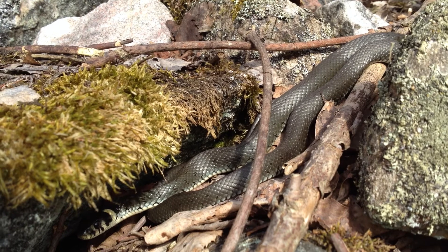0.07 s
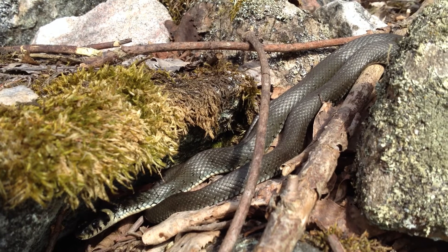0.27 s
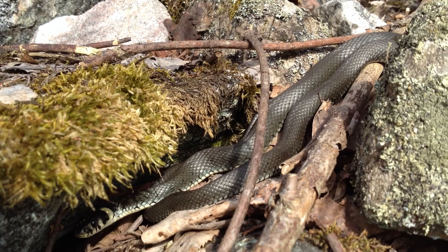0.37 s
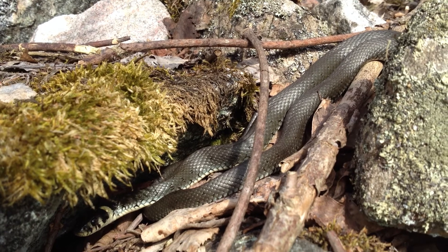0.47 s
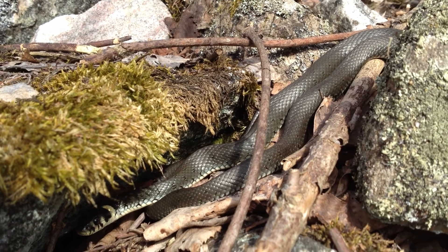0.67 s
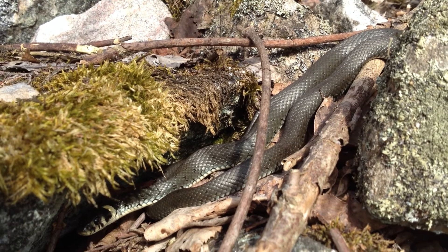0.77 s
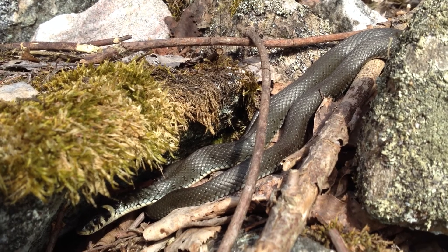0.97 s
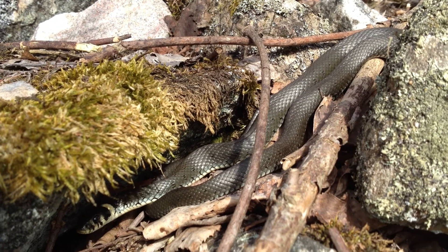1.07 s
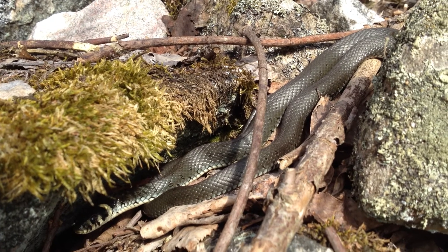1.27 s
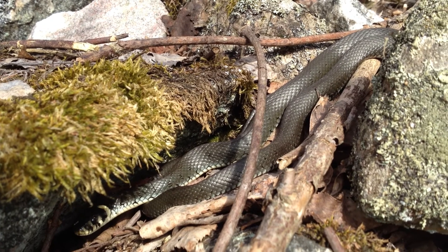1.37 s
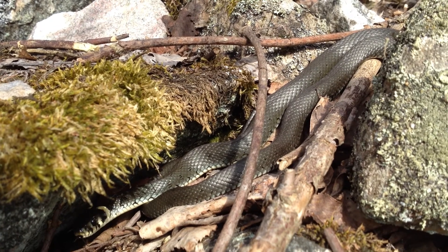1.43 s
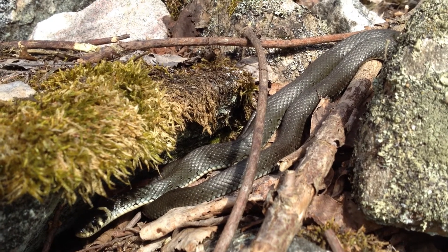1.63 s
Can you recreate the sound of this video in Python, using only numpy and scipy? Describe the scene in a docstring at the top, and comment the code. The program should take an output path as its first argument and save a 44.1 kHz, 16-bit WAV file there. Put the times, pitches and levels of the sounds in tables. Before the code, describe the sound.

Dry leaves rustle and small twigs snap in uneven bursts under a slithering snake.

```python
"""A snake slides through dry leaves and twigs between rocks, close to the microphone.
From the start, over faint outdoor air, its scales rub the litter in a fine crackle, and the rocks
scatter the rustle for a few hundredths of a second. Leaves crumple in short bursts, then ribs and
twigs crack. A soft bump on the ground follows near 0.4 s. From 0.6 s the belly drags over single
leaves and twigs, around 1 s a stick knocks three times, and a few small cracks end the scene."""
import sys
import numpy as np
from scipy import signal
from scipy.fft import rfft, irfft
from scipy.io import wavfile

SR = 44100
rng = np.random.default_rng(int(sys.argv[2]) if len(sys.argv) > 2 else 0)


def wav_out(sig):
    """Save sig, one row per channel (or a flat mono array), as 16-bit PCM at SR to the path in sys.argv[1]."""
    wavfile.write(sys.argv[1], SR, np.round(np.clip(np.atleast_2d(sig).T, -1, 1) * 32767).astype(np.int16))


N = 74970  # 1.7 s


def undb(db):
    """Turn decibels into a factor to multiply by."""
    return 10 ** (np.asarray(db) / 20)


def unit(x):
    """Scale a signal to an average power of 1."""
    return x / np.sqrt(np.mean(x ** 2) + 1e-24)


def colour(x, points, tilt_db=0):
    """Shape the tone along a curve of (Hz, dB) points; tilt_db per octave makes it brighter."""
    hz, db = np.array(points, float).T
    octave = np.log2(np.maximum(np.fft.rfftfreq(4096, 1 / SR), 10))
    gain = unit(undb(np.interp(octave, np.log2(hz), db) + tilt_db * octave))
    cepstrum = irfft(np.log(gain))
    fold = 1 + np.sign(np.fft.fftfreq(len(cepstrum)))  # makes the filter ring after a click, not before
    response = irfft(np.exp(rfft(cepstrum * fold)))
    return signal.fftconvolve(x, response)[:len(x)]


def resonate(x, hz, width_hz):
    """Keep the sound around one pitch and turn the rest down."""
    b, a = signal.iirpeak(hz, hz / min(width_hz, SR / 3), fs=SR)
    return signal.lfilter(b, a, signal.lfilter(b, a, x))


def whiten(x):
    """Give a short burst equal energy at all frequencies, 1 in total."""
    return irfft(np.exp(1j * np.angle(rfft(x))), len(x))


def wander(per_s):
    """A line that drifts to a new random value per_s times a second."""
    return np.interp(np.arange(N) / SR * per_s, np.arange(N), rng.standard_normal(N))


def swell(start, rise, fade):
    """A loudness shape that climbs straight up, then dies away (times in seconds)."""
    t = np.arange(N) / SR - start
    return np.clip(t / rise, 0, 1) * np.exp(-np.maximum(t - rise, 0) / fade)


def crackle(per_s, spread_db):
    """Tiny clicks, or grains, at random moments, a few much larger than the rest."""
    size = undb(spread_db * np.minimum(rng.exponential(size=N), 4))
    return unit((rng.random(N) < per_s / SR) * size * rng.choice([-1, 1], N))


# Tone of the outdoor air: f/Hz, relative level/dB
AIR_TONE = [(25, -37), (60, -13), (100, -11.5), (170, 3.5), (240, 2), (330, 0.5), (700, -4.5), (1200, -2.5),
            (2500, -10), (4000, -5.5), (6000, -25), (15000, -30)]
def air(level_db=-70):
    """Still outdoor air makes a faint, steady, low hush."""
    return undb(level_db) * colour(rng.standard_normal(N), AIR_TONE)


GRAINS_PER_S, GRAIN_SPREAD_DB = 4000, 3.4
# Borders between the sounds of coarse, middle and fine pieces of litter: f/Hz
BAND_EDGES = [2200, 4200, 7800]
# Tone of the rubbing: f/Hz, relative level/dB
RUB_TONE = [(40, -64), (120, -51), (300, -16.5), (700, -7.5), (1100, -6), (1600, -6.5), (2400, -3.5),
            (3800, -3), (5500, -2), (7500, 2), (10000, -2), (12500, -1.5), (15000, -0.5)]
# How loudly the body rubs as it slides: t/s, level/dB
RUB_LEVELS = [(0, -57.5), (0.054, -54.5), (.08, -68.5), (.16, -70.5), (.19, -66), (.24, -54), (.275, -55),
              (.3, -46.5), (0.351, -45.5), (.375, -57.5), (0.412, -56.5), (.5, -64.5), (.58, -58),
              (.65, -59), (.68, -52), (.725, -51), (.76, -47), (0.819, -49), (.85, -59.5), (.89, -56),
              (.935, -52.5), (.958, -55), (1.0, -52.5), (1.035, -51), (1.07, -49.5), (1.115, -53),
              (1.19, -54.5), (1.225, -51.5), (1.25, -59), (1.285, -52), (1.33, -66), (1.365, -53.5),
              (1.43, -56.5), (1.491, -52.5), (1.545, -64.5), (1.6, -62), (1.7, -62.5)]
def scales(flutter_db=2.1, flutter_per_s=170, broad_share=0.91):
    """Scales catch and slip on the litter: a dense crackle that flutters with each catch."""
    level_db = np.interp(np.arange(N) / SR, *np.array(RUB_LEVELS).T)
    level_db += flutter_db * wander(flutter_per_s)
    band = np.searchsorted(BAND_EDGES, np.fft.rfftfreq(N, 1 / SR))
    narrow = sum(irfft(rfft(crackle(GRAINS_PER_S, GRAIN_SPREAD_DB)) * (band == k), N)
                 for k in range(len(BAND_EDGES) + 1))  # each band has its own grains
    broad = crackle(GRAINS_PER_S, GRAIN_SPREAD_DB)  # these sound in all bands at once
    grains = np.sqrt(broad_share) * broad + np.sqrt(1 - broad_share) * narrow
    return colour(grains * undb(level_db), RUB_TONE)


def rocks(x, echo_db=-15.5, delay_s=0.002, fade_60db_s=0.04):
    """The stones around scatter the sound, adding a short blur of echoes."""
    t = np.arange(SR // 5) / SR
    fading_noise = rng.standard_normal(len(t)) * np.exp(-np.log(1000) * t / fade_60db_s)
    echo = whiten(fading_noise)[:len(t) // 2]
    delayed = np.concatenate([np.zeros(int(delay_s * SR)), echo])
    return x + undb(echo_db) * signal.fftconvolve(x, delayed)[:N]


# Tone of a dry leaf: f/Hz, relative level/dB
LEAF_TONE = [(40, -57), (120, -19.5), (300, -7.5), (700, -17.5), (1300, -2.5), (3000, -0.5), (4500, 2),
             (6000, 1.5), (7800, 2), (10000, -2), (12300, 1), (15000, -2.5)]
# Leaves crumpling: t/s, rise/s, fade/s, level/dB, brightness/(dB per octave)
LEAF_CRUMPLES = [(0.026, 0.0064, 0.011, -57, -3), (0.164, 0.0014, 0.012, -59.5, -4),
                 (.197, 0.0013, 0.01, -48.5, 2), (0.224, 0.0082, 0.009, -46.5, 2.5),
                 (0.2825, 0.00071, 0.0074, -40, 1.5), (0.322, 0.0052, 0.013, -34.5, 1.5),
                 (.333, 0.004, 0.0033, -40, -0.5), (0.382, 0.004, 0.012, -50.5, -1.5),
                 (0.508, 0.0035, 0.004, -52, 2.5), (0.619, 0.0071, 0.0098, -51.5, 2.5),
                 (.856, 0.0016, 0.0099, -48, 0.5), (0.896, 0.0027, 0.0097, -45.5, -2),
                 (0.91, 0.0088, 0.0094, -42.5, 2.5), (0.967, 0.0096, 0.0087, -40.5, 1),
                 (1.046, 0.0018, 0.006, -41, -1), (1.164, 0.0048, 0.016, -50, 1),
                 (1.184, 0.0071, 0.0028, -48, 0), (1.241, 0.0021, 0.0015, -35, 8),
                 (1.253, 0.0018, 0.0058, -36, 7.5), (1.259, 0.0043, 0.0089, -43.5, 3.5),
                 (1.301, 0.0013, 0.0022, -47.5, 0), (1.345, 0.0022, 0.006, -51.5, 1)]
def leaves():
    """Each leaf gives way in a swelling shower of tiny breaks."""
    grains = crackle(per_s=9000, spread_db=4)
    return sum(colour(grains * swell(start, rise, fade) * undb(db), LEAF_TONE, tilt)
               for start, rise, fade, db, tilt in LEAF_CRUMPLES)


# Tone shared by all cracks: f/Hz, relative level/dB
CRACK_TONE = [(50, -52), (700, -10), (1400, -6.5), (3000, -1), (6000, -6), (7800, 2), (10000, -1),
              (12300, 9), (15000, -7.5)]
# Single cracks of leaf ribs and twigs: t/s, level/dB, f/Hz, fade/s
RIB_CRACKS = [(0.1725, -50.5, 8740, 0.00039), (0.2314, -43.5, 8350, 0.0005), (0.259, -39, 8100, 0.00019),
              (0.2675, -38.5, 7450, 0.00051), (.2822, -29, 8060, 0.00031), (0.3062, -41, 7950, .0003),
              (0.3131, -28.5, 4840, 0.0003), (0.3353, -27, 7850, 0.00047), (0.3366, -29.5, 1930, 0.00018),
              (0.3427, -27, 3600, 0.00023), (0.3434, -28, 7660, 0.00028), (0.388, -39, 7100, 0.00017),
              (0.4445, -45, 4500, 0.00015), (0.448, -43, 4770, 0.00033), (0.465, -41, 5850, 0.00064),
              (0.4657, -49.5, 2600, 0.0005), (0.5245, -46.5, 4300, 0.00049), (.679, -40, 3930, 0.00046),
              (0.9064, -41.5, 8550, 0.00036), (0.9184, -31, 5150, 0.00043), (0.9185, -36.5, 14200, 0.00044),
              (1.0225, -51, 6500, 0.00048), (1.0413, -42, 2750, 0.00058), (1.042, -44, 8150, 0.00075),
              (1.079, -48, 6900, 0.00048), (1.5378, -45, 5800, 0.00065), (1.6256, -59, 7000, 0.00057),
              (1.6463, -58, 9700, 0.00087), (1.651, -51.5, 5800, .0005), (1.683, -51.5, 5800, 0.0006)]
def cracks(window_s=0.02, sharpness=2.2, raw_tear_db=-6):
    """A leaf rib or twig tears in a millisecond or so: a snap that rings around its own pitch."""
    out = np.zeros(N)
    t = np.maximum(np.arange(-window_s / 2, window_s / 2, 1 / SR), 0)  # the tear starts halfway in
    for time, db, hz, fade in RIB_CRACKS:
        tear = whiten(rng.choice([-1, 1], len(t)) * t ** 2 * np.exp(-t / fade))
        ring = unit(resonate(tear, hz, hz / sharpness))
        snap = unit(ring + undb(raw_tear_db) * unit(tear))
        snap *= np.sqrt(2 * fade / window_s)  # a longer tear carries more energy
        at = int((time - fade - window_s / 2) * SR)
        out[at:at + len(t)] += undb(db) * snap[:N - at]
    return colour(out, CRACK_TONE)


def thud(level_db=-78):
    """A soft bump on the ground gives a brief, low rumble."""
    rumble = unit(resonate(rng.standard_normal(N), hz=85, width_hz=110))
    return undb(level_db) * rumble * swell(start=0.372, rise=0.014, fade=0.027)


# Long drags over one leaf or twig, plus a brief chatter of the stick around its loudest knock (the 720 Hz row):
# t/s, length/s, level/dB, f/Hz
RINGING_DRAGS = [(0.627, 0.16, -60.5, 3850), (0.724, 0.13, -58, 3300), (0.964, 0.058, -58.5, 720),
                 (1.144, 0.063, -66, 1040), (1.238, 0.048, -65, 664), (1.306, 0.26, -70.5, 845)]
def drags(sharpness=1.53):
    """The belly drags over a single leaf or twig, and the knocked stick chatters briefly; the grains ring
    loosely around each one's pitch."""
    grains = crackle(GRAINS_PER_S, GRAIN_SPREAD_DB)
    out, t = np.zeros(N), np.arange(N) / SR
    for start, length, db, hz in RINGING_DRAGS:
        arch = np.sin(np.pi * np.clip((t - start) / length, 0, 1))
        out += undb(db) * arch * unit(resonate(grains, hz, hz / sharpness))
    return out


# Tones the stick rings with: f/Hz, relative level/dB, time to fade by 60 dB/s
STICK_TONES = [(283, -10.5, 0.024), (490, -6.5, 0.012), (783, -4, 0.023), (1265, -4.5, 0.02),
               (1920, -13, 0.017), (2590, -2, 0.0092)]
# Knocks on the stick: t/s, level/dB
STICK_KNOCKS = [(.899, -48.5), (.9803, -34), (1.05, -60)]
def stick(contact_s=0.0003, low_cut_hz=186):
    """A dry stick is nudged against its neighbour and rings dully; it is too thin to give much bass."""
    out, t = np.zeros(N), np.arange(SR // 10) / SR
    ring = sum((-1) ** k * undb(db) * np.sin(2 * np.pi * hz * t) * np.exp(-np.log(1000) * t / fade)
               for k, (hz, db, fade) in enumerate(STICK_TONES))
    knock = ring * (1 - np.exp(-t / contact_s))
    for start, db in STICK_KNOCKS:
        at = int(start * SR)
        out[at:at + len(t)] += undb(db) * knock
    return signal.sosfilt(signal.butter(2, low_cut_hz, "high", fs=SR, output="sos"), out)


def scene():
    """The air, the rustle among the rocks and the bump, mixed into one channel."""
    hush = air()
    rustle = scales() + leaves() + cracks() + drags() + stick()
    return (hush + rocks(rustle) + thud())[None]


def record(dry, soften_hz=15200, cut_hz=15350):
    """The microphone softens the highest treble and the recorder cuts off the top."""
    soft = signal.sosfilt(signal.butter(2, soften_hz, fs=SR, output="sos"), dry)
    return signal.sosfilt(signal.ellip(10, .2, 80, cut_hz, fs=SR, output="sos"), soft)


dry = scene()
out = record(dry)
wav_out(out)
```